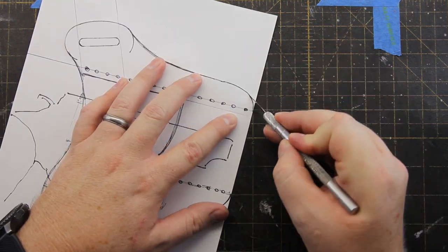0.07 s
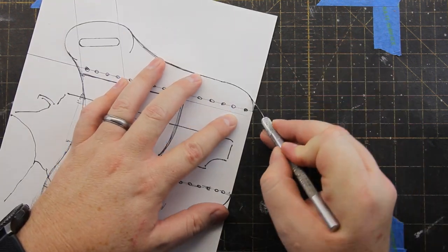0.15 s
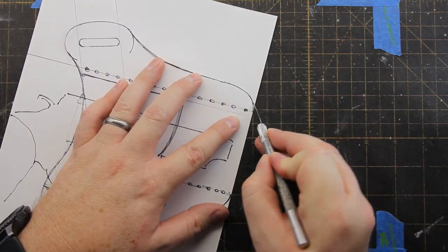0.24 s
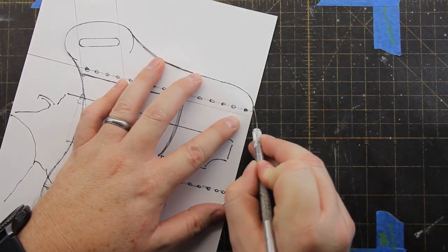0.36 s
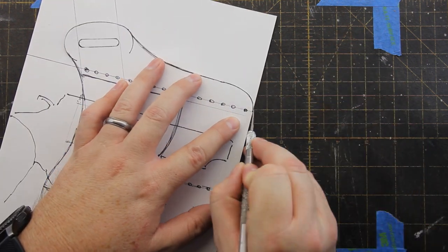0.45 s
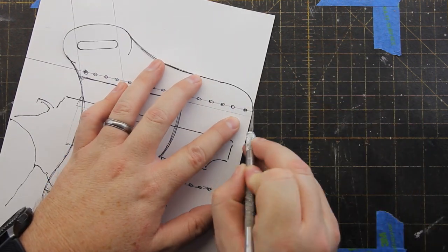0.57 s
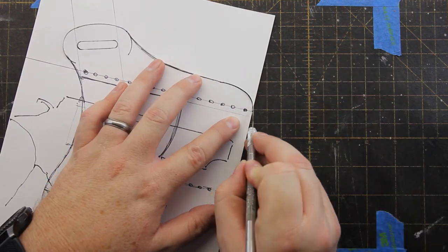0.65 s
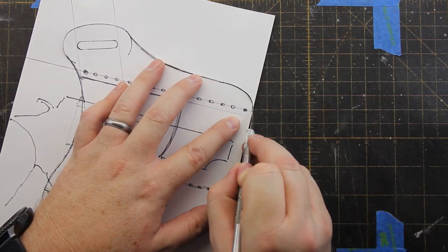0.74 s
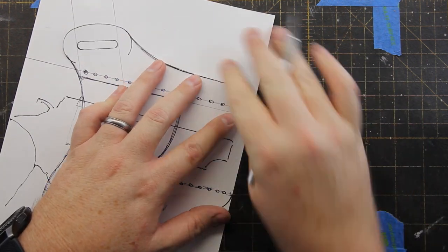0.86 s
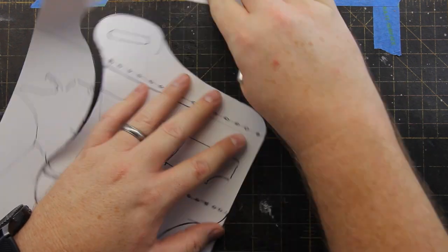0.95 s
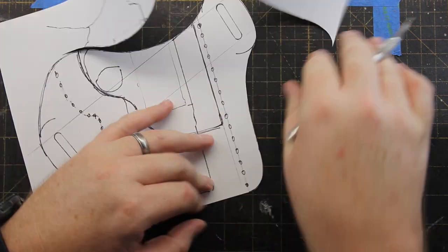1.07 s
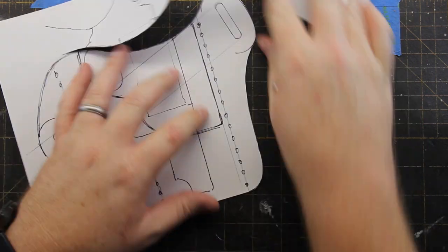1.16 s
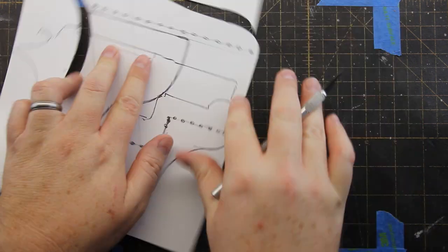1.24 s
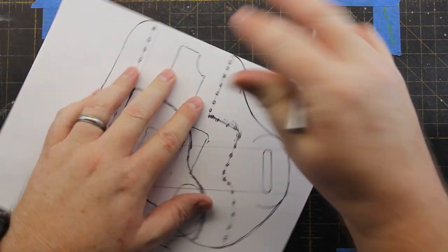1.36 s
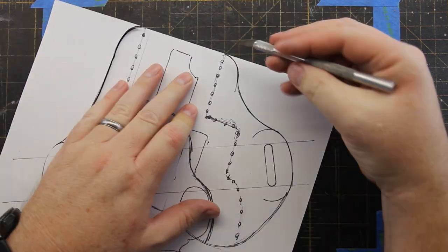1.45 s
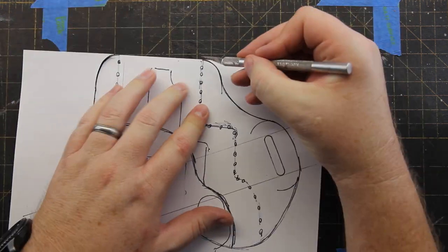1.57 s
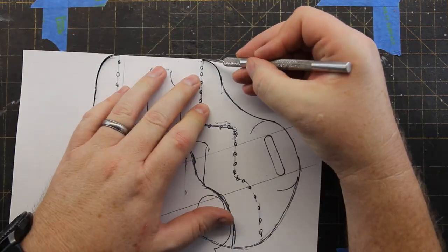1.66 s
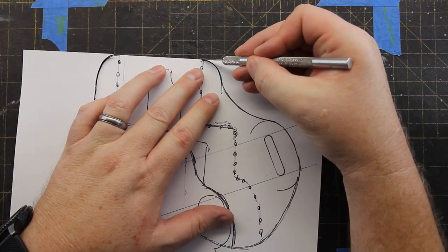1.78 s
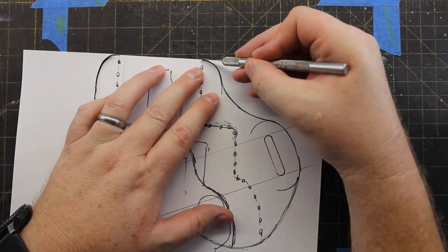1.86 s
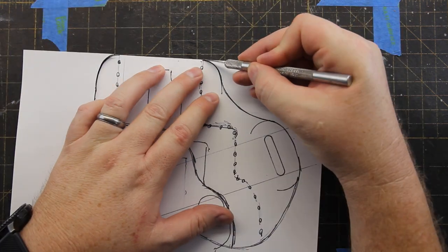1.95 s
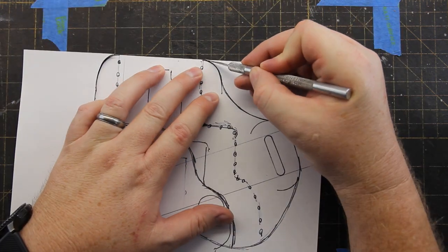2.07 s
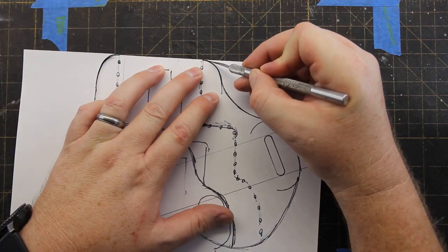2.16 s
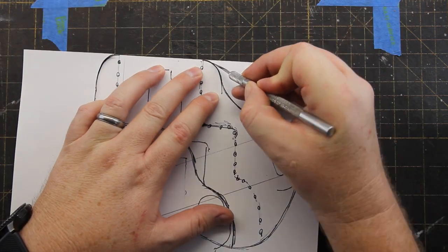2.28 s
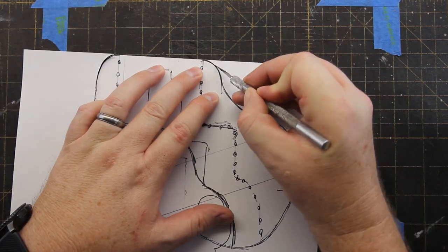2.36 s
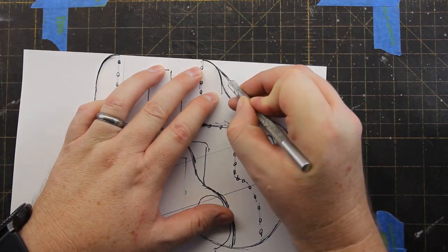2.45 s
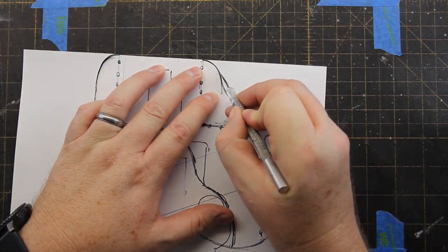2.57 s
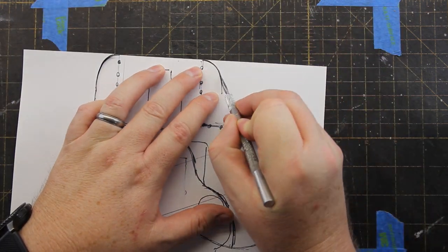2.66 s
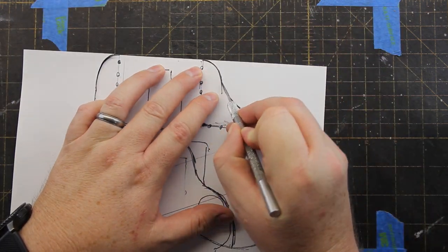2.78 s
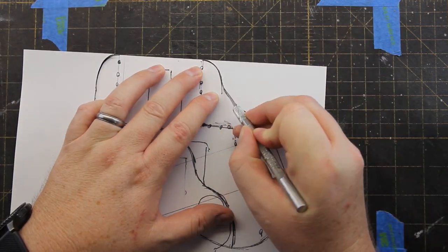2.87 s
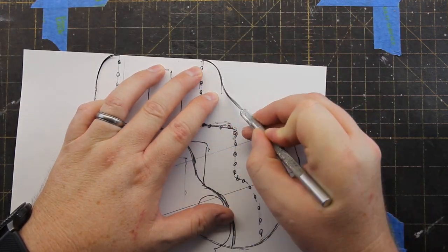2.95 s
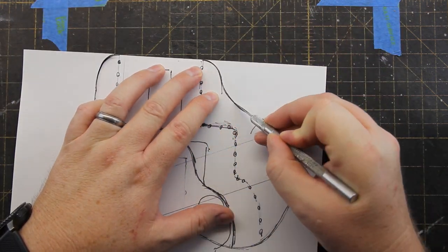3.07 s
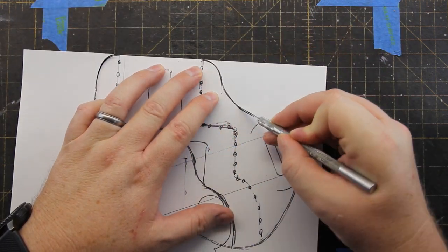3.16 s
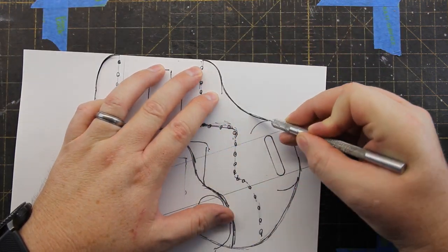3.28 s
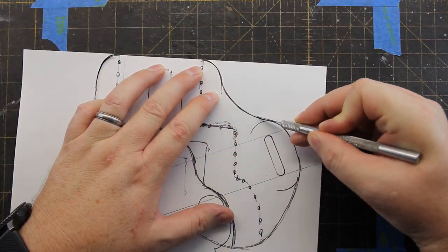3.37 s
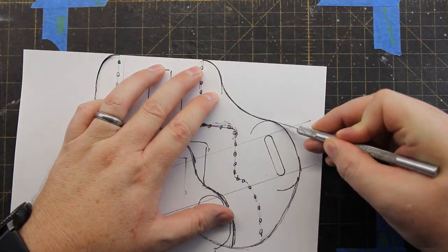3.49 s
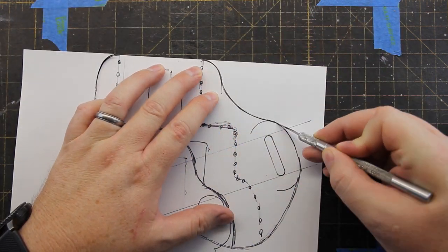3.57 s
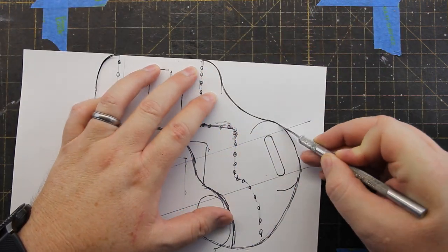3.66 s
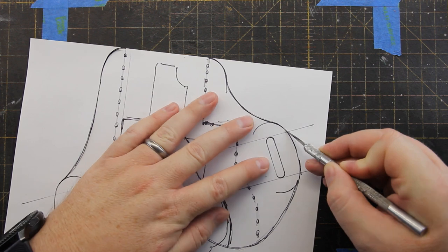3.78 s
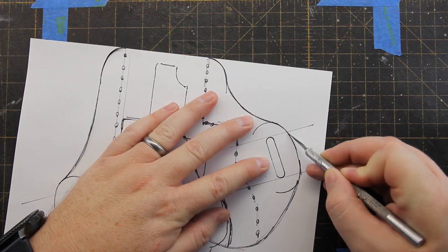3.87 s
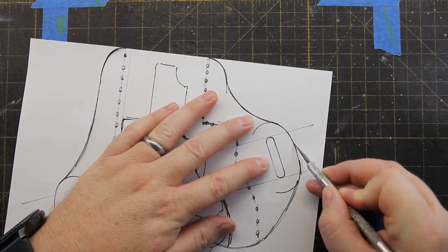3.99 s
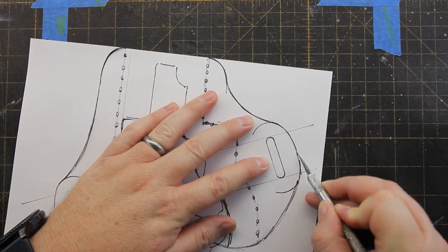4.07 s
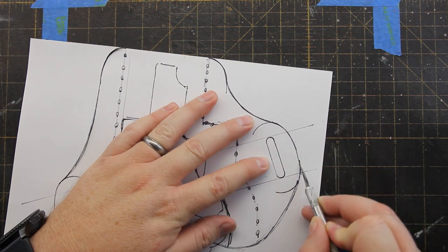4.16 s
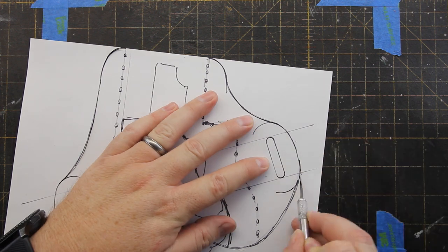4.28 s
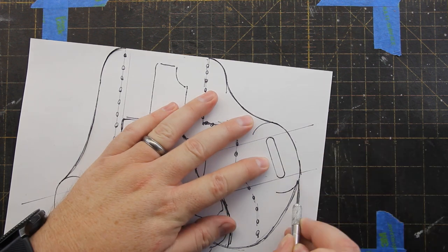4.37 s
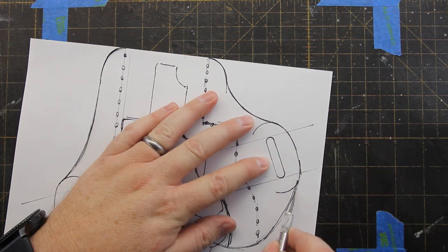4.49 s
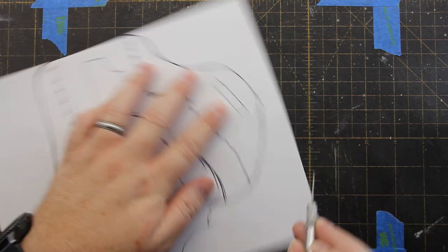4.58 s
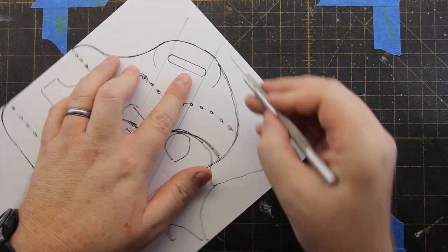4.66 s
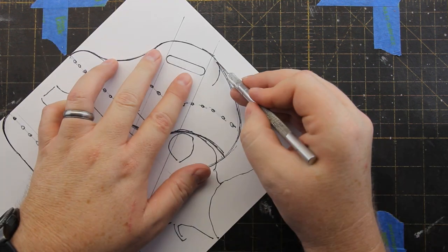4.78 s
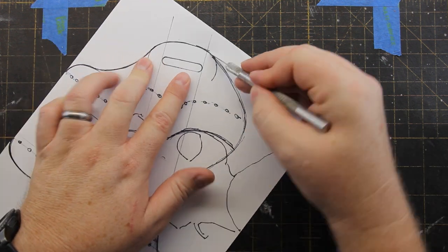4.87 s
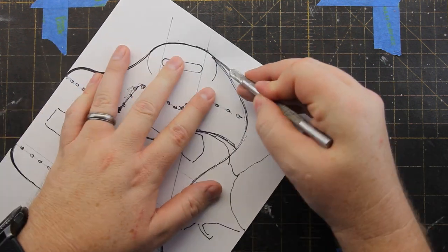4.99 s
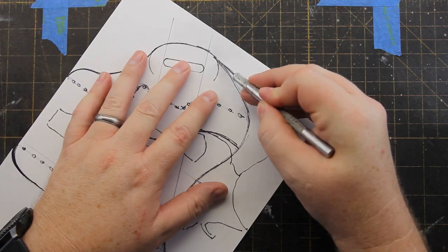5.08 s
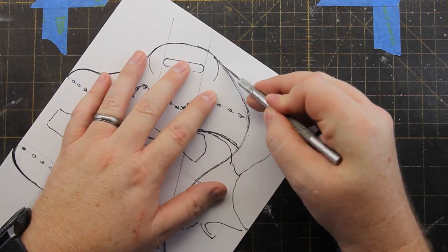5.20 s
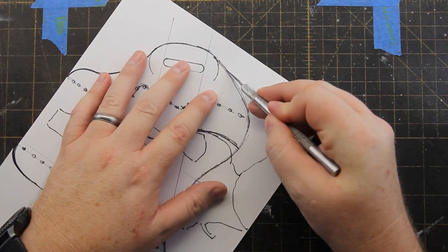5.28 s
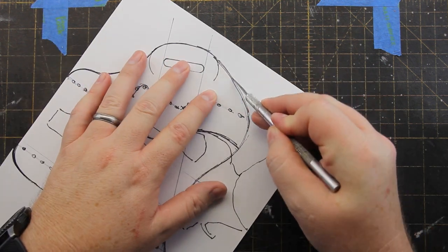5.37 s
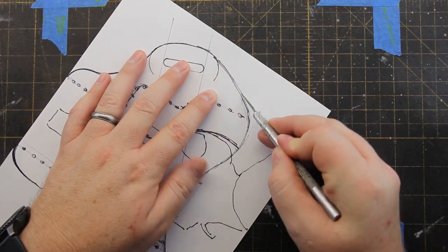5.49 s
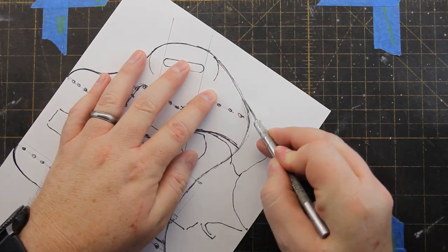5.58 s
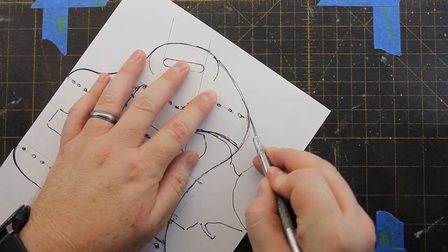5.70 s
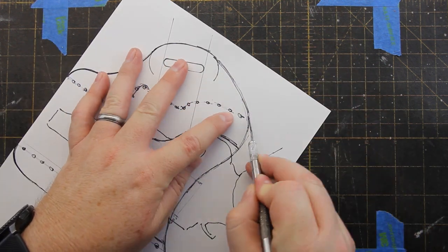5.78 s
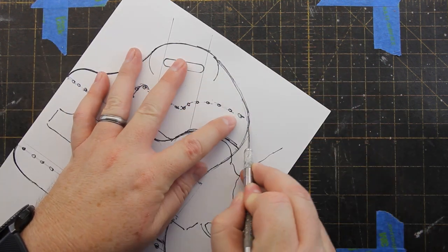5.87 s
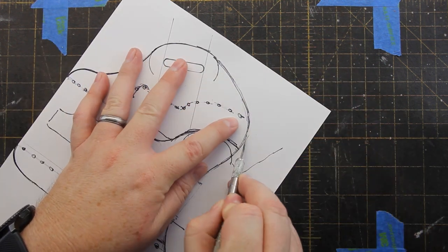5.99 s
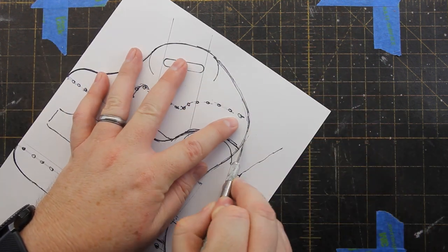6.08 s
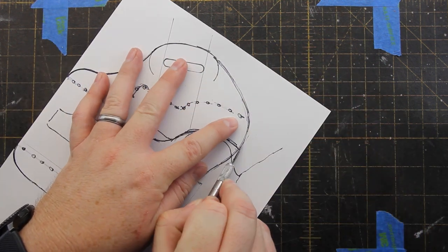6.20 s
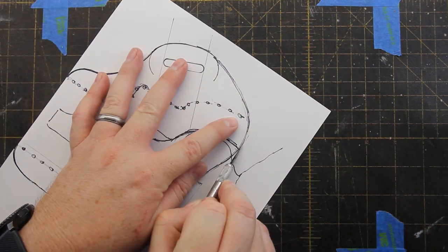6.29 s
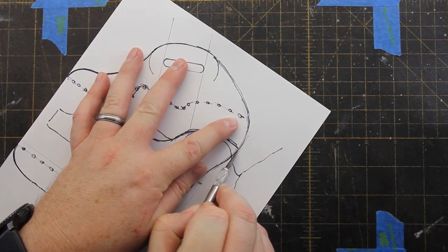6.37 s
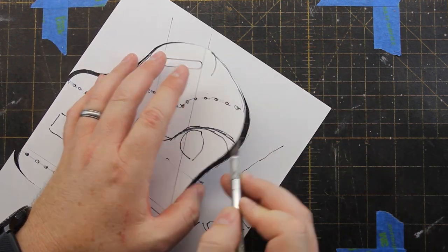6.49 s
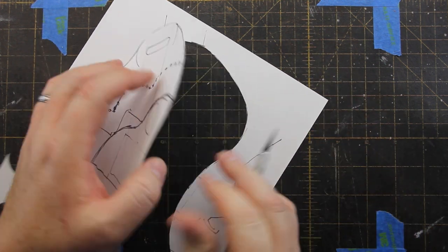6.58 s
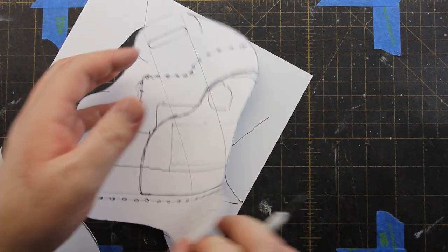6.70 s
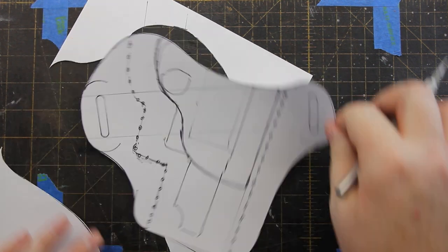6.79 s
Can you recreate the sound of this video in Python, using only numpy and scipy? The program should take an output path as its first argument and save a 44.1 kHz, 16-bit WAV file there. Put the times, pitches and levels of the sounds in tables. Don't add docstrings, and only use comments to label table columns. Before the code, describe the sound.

Hissy workroom with a wavering distant motor whine; close paper rasps and snaps as it is turned, light knocks follow, then a crisp flick.

```python
import sys
import numpy as np
from scipy import signal
from scipy.fft import rfft, irfft, next_fast_len
from scipy.io import wavfile
from scipy.ndimage import uniform_filter1d

SR = 44100
rng = np.random.default_rng(int(sys.argv[2]) if len(sys.argv) > 2 else 0)


def how_loud(loudness_db):
    steps = np.asarray(loudness_db, float) / 20
    return 10 ** steps


def int16_out(signal):
    q = np.round(np.clip(np.atleast_2d(signal).T, -1, 1) * 32767)
    wavfile.write(sys.argv[1], SR, q.astype(np.int16))


N = 301688
TIME = np.arange(N) / SR


def noise():
    return rng.standard_normal(N)


def unit(x):
    return x / np.sqrt(np.mean(x ** 2))


def curve(table):
    s, *columns = np.transpose(table)
    return [np.interp(TIME, s, c) for c in columns]


def colour(x, points):
    hz, db = np.transpose(points)
    size = next_fast_len(N)
    log_hz = np.log(np.arange(size // 2 + 1) * SR / size + 1)
    weight = how_loud(np.interp(log_hz, np.log(hz), db))
    return unit(irfft(rfft(x, size) * weight, size)[:N])


def band(x, lo_hz, hi_hz, order=3):
    edges = [lo_hz, min(hi_hz, 0.45 * SR)]
    return unit(signal.sosfilt(signal.butter(order, edges, "band", fs=SR, output="sos"), x))


def resonance(hz, width_hz):
    return band(noise(), hz - width_hz / 2, hz + width_hz / 2, order=1)


def walk(rate):
    k = int(SR / rate)
    levels = np.repeat(rng.standard_normal(N // k + 1), k)
    return unit(uniform_filter1d(uniform_filter1d(levels, k), k)[:N])


def tone(hz, flicker_db, rate):
    phase = 2 * np.pi * np.cumsum(hz) / SR
    strength = np.sqrt(2) * how_loud(flicker_db * walk(rate))
    return strength * np.sin(phase + 0.3 * walk(rate))


def add(out, s, hz, db, t60, rise_s):
    start = int(s * SR)
    t = TIME[:min(int(1.2 * t60 * SR), N - start)]
    fade = how_loud(db - 60 * t / t60) * (1 - np.exp(-t / rise_s))
    out[start:start + len(t)] += fade * np.sin(2 * np.pi * hz * t)


# frequency in Hz, level in dB per Hz.
AIR_COLOUR = [(24, -94), (40, -52), (185, -27.5), (276, -14.5), (312, -8), (363, -16), (556, -9.5),
              (600, -12.5), (1070, -11.5), (1270, -7), (2000, -8.5), (5050, -7.5), (9450, -13),
              (10400, -12.5), (16000, -19.5)]


def air():
    return how_loud(-54.04 + 0.73 * walk(2.16)) * colour(noise(), AIR_COLOUR)


# time in seconds, frequency in Hz, level in dB.
FAN_LINE = [
    (0, 10140, -63.5),
    (1.5, 10126, -63),
    (2.5, 10150, -63.5),
    (3.6, 10120, -63.5),
    (4.5, 10140, -62.5),
    (5.5, 10160, -64.5),
    (6.84, 10160, -67.5),
]
# multiple of the blade rate, level in dB above the line table.
FAN_ORDERS = [(1, -12.5), (12, -15), (14, -7.5), (16, -8.5), (17, -25), (18, -6), (19, -7.5), (21, -14)]
# frequency in Hz, width in Hz, level in dB.
HUMS = [
    (1590, 9.3, -100),
    (1628, 9.8, -73),
    (1735, 3.6, -73),
    (1910, 7.4, -74),
]


def fan():
    hz, db = curve(FAN_LINE)
    out = np.zeros(N)
    for order, order_db in FAN_ORDERS:
        out += how_loud(db + order_db) * tone(hz * order / 18, 2.2, 15)
    swell_s, swell_width_s, swell_db = 2.82, 0.45, 10
    drone_db = -82 + swell_db * np.exp(-((TIME - swell_s) / swell_width_s) ** 2)
    out += how_loud(drone_db) * tone(np.full(N, 319.0), 1.45, 11)
    for hum_hz, width_hz, hum_db in HUMS:
        out += how_loud(hum_db) * resonance(hum_hz, width_hz)
    return out


# time in seconds, whine in Hz, whine level in dB, shaft wobble sideband in dB.
MOTOR_WHINE = [(0.0, 1412, -62, -72), (0.6, 1367, -70.5, -67), (0.77, 1357, -52.5, -82),
               (0.89, 1346, -67.5, -85), (1.05, 1340, -60, -78), (1.27, 1325, -73, -70),
               (1.93, 1306, -56, -64.5), (2.24, 1295, -81, -71), (2.46, 1296, -60.5, -74),
               (2.98, 1292, -81, -73), (3.25, 1297, -73, -63), (4.38, 1302, -59, -63),
               (4.9, 1296, -58, -71), (5.46, 1293, -64, -73), (5.79, 1286, -61, -63), (6.1, 1278, -73, -71),
               (6.49, 1280, -59.5, -61), (6.84, 1296, -71, -74)]
# multiple, level in dB above the third.
OVERTONES = [(4, -5), (5, -6.5)]
# frequency in Hz, width in Hz, level in dB.
HOUSING = [
    (2354, 64, -1.5),
    (2776, 55, -3),
    (3417, 110, -2.5),
    (4710, 44, 1),
    (5205, 100, -0.5),
    (3897, 100, -4),
    (4456, 52, -7.5),
]
# frequency in Hz, level in dB per Hz.
RUSH_COLOUR = [(250, -30), (400, -7), (1100, -0.5), (2000, -1.5), (2900, 4), (5200, -1), (7000, -0.5),
               (10000, -5), (16000, -15.5)]
# time in seconds, level in dB.
RUSH_LEVEL = [(0.0, -50.5), (0.38, -53.5), (0.99, -51.5), (1.14, -50.5), (1.56, -51), (2.1, -54.5),
              (2.78, -55.5), (4.55, -51), (4.78, -51.5), (5.09, -53), (5.64, -50.5), (6.17, -53),
              (6.84, -52)]
# time in seconds, strain in dB.
STRAIN = [
    (0, -1),
    (1.5, -4),
    (3.5, -2.5),
    (3.8, -1.5),
    (4.55, 1.5),
    (5.2, -.6),
    (5.65, 4.5),
    (6.05, 1.5),
    (6.42, 3.5),
    (6.84, -0.5),
]


def motor():
    hz, db, side_db = curve(MOTOR_WHINE)
    (rush_db,), (strain_db,) = curve(RUSH_LEVEL), curve(STRAIN)
    shaft_hz = 32.95
    out = how_loud(db) * tone(hz, 2.3, 25)
    out += how_loud(side_db) * tone(hz + shaft_hz + 4.5 * walk(7), 1.9, 30)
    out += how_loud(side_db - 9.5) * tone(hz + 2 * shaft_hz, 2.8, 13)

    lift_db = 1.3 * strain_db + 0.25 * (side_db - side_db.mean())
    out += how_loud(-70.5 + lift_db) * tone(2 * hz + 9 * walk(14), 3.3, 35)
    out += how_loud(-71.5 + lift_db) * tone(3 * hz, 2.8, 45)
    for multiple, over_db in OVERTONES:
        out += how_loud(-71.5 + lift_db + over_db) * tone(multiple * hz, 2.8, 45)

    dulling_db = 2.5 * np.maximum(TIME - 4.6, 0)
    housing = np.zeros(N)
    for mode_hz, width_hz, mode_db in HOUSING:
        level_db = mode_db + 1.5 * walk(7.8) - dulling_db * np.log2(mode_hz / 3400)
        housing += how_loud(level_db) * resonance(mode_hz, width_hz)
    out += how_loud(rush_db - 14 + strain_db) * housing

    extra = np.sqrt(how_loud(2 * rush_db) - how_loud(2 * rush_db.min()))
    return out + extra * how_loud(-3.5) * colour(noise(), RUSH_COLOUR)


def slips(steady):
    step, offset = 1024, 610
    side = np.zeros(N)
    f = np.arange(step + 1) * SR / (2 * step)
    for when, where in rng.random(size=(22, 2)):
        start = offset + step * int(when * (N // step - 3))
        span = slice(start, start + 2 * step)
        lo_hz = 4200 * 2 ** (1.6 * where)
        spin = np.exp(2j * np.pi * rng.random(step + 1)) * (f > lo_hz) * (f < 1.2 * lo_hz)
        side[span] += np.sqrt(np.hanning(2 * step)) * irfft(rfft(steady[span]) * spin)
    return how_loud(-4.5) * side * np.array([[1], [-1]])


# start in seconds, peak in dB, first mode in Hz, second mode in Hz,
# second mode in dB above the first.
TAPS = [(.225, -51, 600, 880, -6), (.604, -50, 894, 1090, -5), (.915, -46, 910, 1125, -1),
        (.962, -71, 151, 70, -13), (1.325, -38.5, 384, 191, -8), (1.421, -42, 368, 606, -3),
        (1.52, -58, 505, 299.7, -7), (3.15, -64, 417, 300, -10), (3.68, -49.5, 603.4, 1570, 3),
        (3.705, -50, 734, 2020, -8), (3.735, -43, 700, 890, -8), (3.82, -35, 583, 1103, -3.5),
        (3.825, -65, 100, 183, -0.5), (3.84, -52, 2294, 2170, 8), (4.603, -42.5, 975, 666, -6),
        (4.719, -78, 90, 150, 0), (4.969, -47, 620, 395, -5.5), (5.18, -53, 803, 3156, 1),
        (5.887, -46.5, 796.3, 1100, -16), (6.438, -45.5, 1000, 2566, 2), (6.812, -58, 2220, 2073, 8)]


def taps():
    out, rattle = np.zeros(N), np.zeros(N)
    for s, db, hz, other_hz, other_db in TAPS:
        t60 = 0.05 * np.exp(-0.022 * (db + 50))
        add(out, s, hz, db, t60, 0.0025)
        add(out, s + 0.00109, other_hz, db + other_db, 1.16 * t60, 0.0025)
        add(out, s + 0.00385, np.sqrt(hz * other_hz), db - 7, 0.92 * t60, 0.0025)
        rattle_db = db + 14.5 + 9 * np.log2(max(hz, other_hz) / 1700)
        add(rattle, s, 12, rattle_db, 0.52 * t60, 0.0005)
    return out + rattle * band(noise(), 790, 5500, order=2)


# start in seconds, peak in dB, frequency in Hz.
POPS = [(.604, -27.5, 11500), (0.972, -27, 13500), (.991, -20, 13500), (1.07, -33, 9210),
        (1.191, -29, 7200), (1.208, -23, 11500), (1.218, -27, 13800), (1.2214, -29, 12060),
        (1.232, -20, 11300), (1.2342, -29, 14500), (1.291, -26, 10000), (1.304, -38, 4400),
        (1.327, -38, 5200), (1.4234, -39, 8800), (4.606, -33.5, 8700), (4.724, -39, 10000),
        (4.92, -40, 13000), (5.888, -35, 10200), (6.4383, -42, 5200), (6.484, -35, 7600),
        (6.484, -38, 4800), (6.519, -39, 6440), (6.5573, -35, 14600), (6.7358, -26, 9000),
        (6.737, -24, 8000), (6.7402, -16, 7400), (6.7582, -21, 7550)]
# frequency in Hz, level in dB, 60 dB decay in seconds.
SNAP_MODES = [
    (7510, -0.5, 0.01),
    (7730, -3, 0.0066),
    (5130, -20.5, 0.026),
    (3430, -38, 0.0096),
    (9800, -8, 0.0052),
    (13000, -12, .004),
]


def pops():
    out, crackle = np.zeros(N), np.zeros(N)
    for s, db, hz in POPS:
        add(out, s, hz, db + 2, 35 / hz, 0.00015)
        add(out, s + 0.0003, hz * 0.75, db - 8, 25 / hz, 0.00015)
        add(crackle, s, 60, db + 3.5, 0.006, 0.0002)
    snap_s = 6.7453
    for hz, db, t60 in SNAP_MODES:
        add(out, snap_s, hz, db, t60, 0.0009)
    add(out, snap_s + 0.00097, 9000, -9, 0.003, 0.0001)
    add(crackle, snap_s - 0.0015, 25, -14, 0.025, 0.0003)
    add(out, snap_s - 0.004, 45, -64, 0.09, 0.004)
    add(out, snap_s - 0.002, 90, -62, 0.08, 0.004)
    return out + crackle * band(noise(), 4400, 20000, order=2)


# peak in seconds, rise in ms, fall in ms,
# level in dB, patch in contact in octaves.
TURNING = [(.606, 6, 12, -50, .4), (.866, 3, 12, -48, .3), (.909, 5, 16, -40.5, 0.38),
           (.97, 14, 46, -32.5, .1), (.993, 24, 40, -27.5, .2), (1.003, 20, 62, -30.5, 1.55),
           (1.036, 36, 26, -31.5, .6), (1.066, 24, 48, -27, .78), (1.095, 26, 38, -28.5, .6),
           (1.15, 12, 22, -45, 0.5), (1.18, 31, 96, -38, 0.48), (1.22, 6.9, 38, -25.5, 0.17),
           (1.246, 11, 23, -33.5, .1), (1.275, 31, 31, -37.5, 0.62), (1.3, 15, 31, -35.5, 0.11),
           (1.326, 21, 18, -33.5, 0.1), (1.36, 28, 72, -50, .15)]
# peak in seconds, rise in ms, fall in ms, level in dB,
# patch in contact in octaves.
NUDGES = [(4.644, 19, 36, -38, .22), (4.672, 15, 13, -50, 0.18), (5.182, 4, 36, -60, .6),
          (6.485, 3, 18, -45, 1.7), (6.51, 11.6, 17.5, -46, 0.49), (6.55, 39, 25, -57, .55),
          (6.625, 42, 10.8, -55, 1.1), (6.649, 16, 11, -41, 1.15), (6.685, 21, 20.3, -40, 1.46),
          (6.742, 13.5, 6, -33, 1.2), (6.76, 11, 21, -39, .95), (6.778, 16, 36, -44, .3),
          (6.838, 30, 12.5, -40.5, .9)]
SHEET_HZ = [4000, 6000, 9600, 11700, 16200]
RANGE_OCTAVES = np.array([[1.5], [.85], [.4], [0]])
RANGE_DB = np.array([[-5], [-2.5], [-4], [0.3]])


def paper():
    bursts_db = 1.2 * np.minimum(rng.exponential(size=N), 5)
    grains = noise() * how_loud(bursts_db + 0.81 * walk(500) + 0.5 * walk(130))
    tilted = np.diff(grains, prepend=0)
    steep = np.diff(grains, 2, prepend=[0, 0])
    ranges = []
    for source, lo_hz, hi_hz in zip((steep, tilted, grains, tilted), SHEET_HZ, SHEET_HZ[1:]):
        ranges.append(unit(how_loud(2.1 * walk(240)) * band(source, lo_hz - 250, hi_hz, order=5)))

    power = np.zeros((len(ranges), N))
    for s, rise_ms, fall_ms, db, patch in TURNING + NUDGES:
        span = slice(int((s - 0.15) * SR), int((s + 0.15) * SR))
        ms = 1000 * (TIME[span] - s)
        drag_db = db - 18 * np.maximum(-ms / rise_ms, ms / fall_ms) ** 1.65
        under = RANGE_OCTAVES - patch
        loss_db = np.maximum(25 * under, -4 * under)
        power[:, span] += how_loud(2 * (drag_db + RANGE_DB - loss_db))
    return np.sum(np.sqrt(power) * ranges, axis=0)


def scene():
    steady = air() + motor() + fan()
    return steady + paper() + pops() + taps() + slips(steady)


def roll_off(x):
    return signal.sosfilt(signal.butter(12, 16910, fs=SR, output="sos"), x)


def record(dry):
    top_cut = signal.ellip(8, 0.2, 70, 15900, fs=SR, output="sos")
    mix = signal.sosfilt(top_cut, dry)
    return roll_off(mix)


dry = scene()
out = record(dry)
int16_out(out)
```